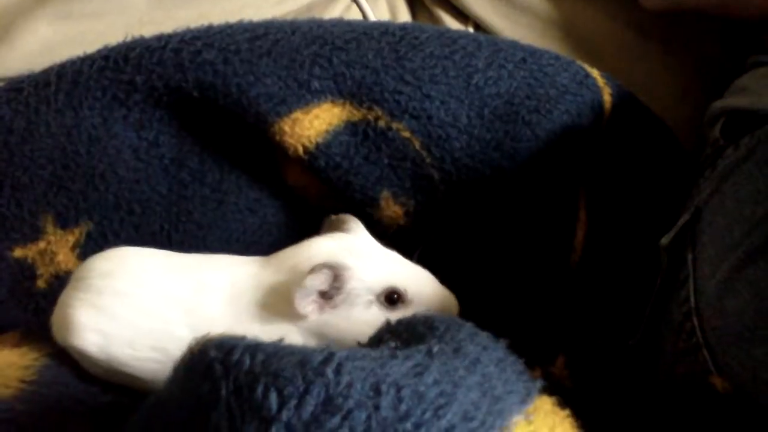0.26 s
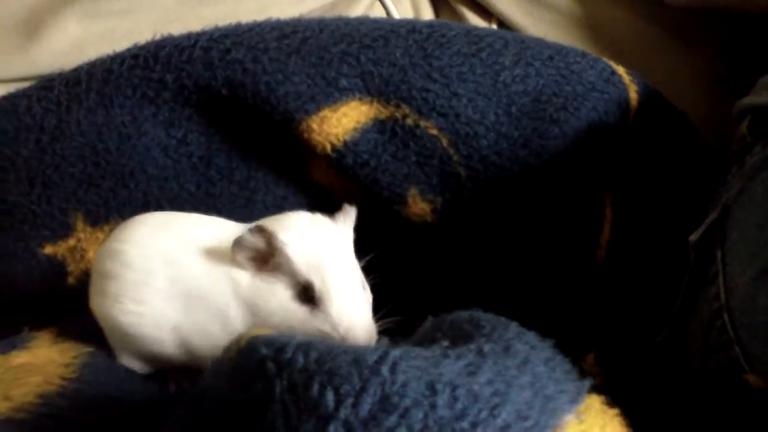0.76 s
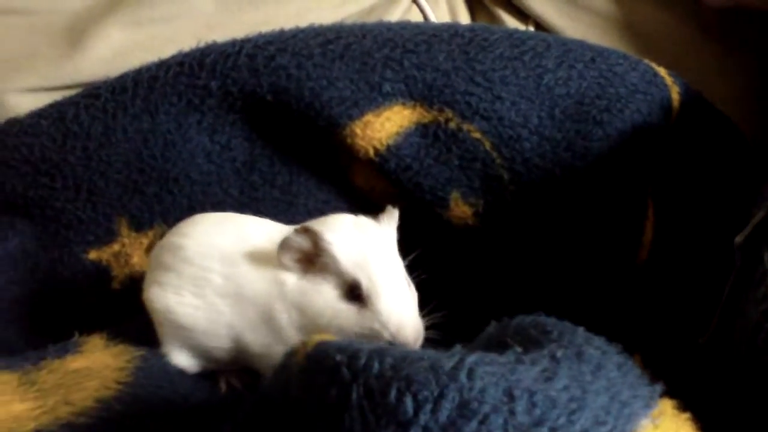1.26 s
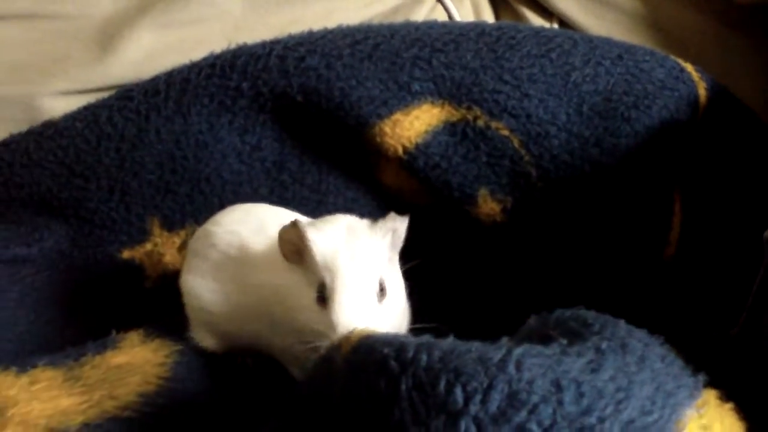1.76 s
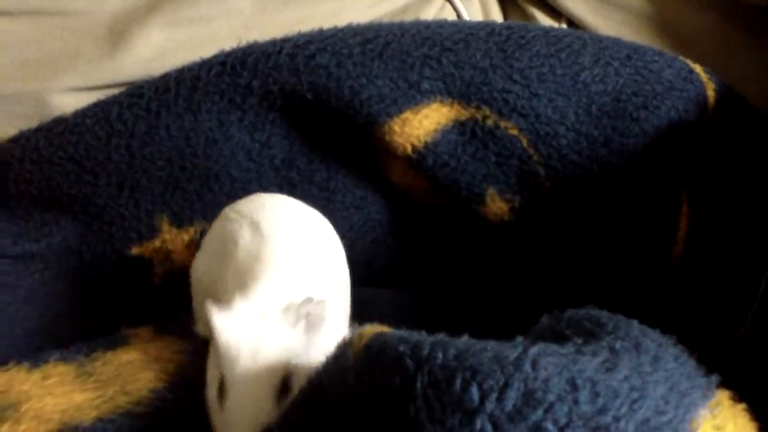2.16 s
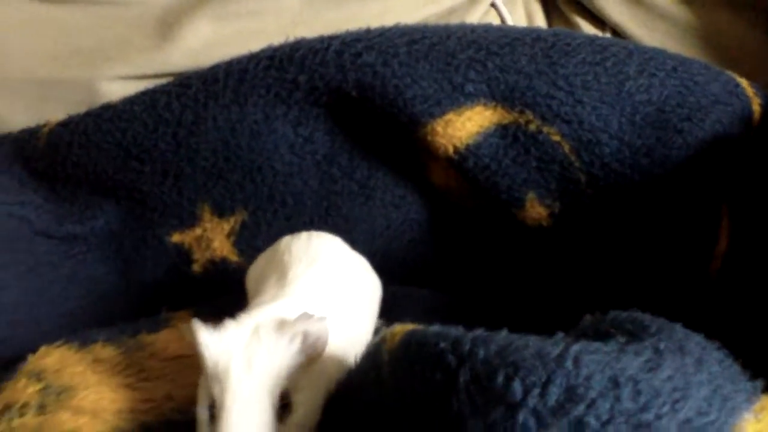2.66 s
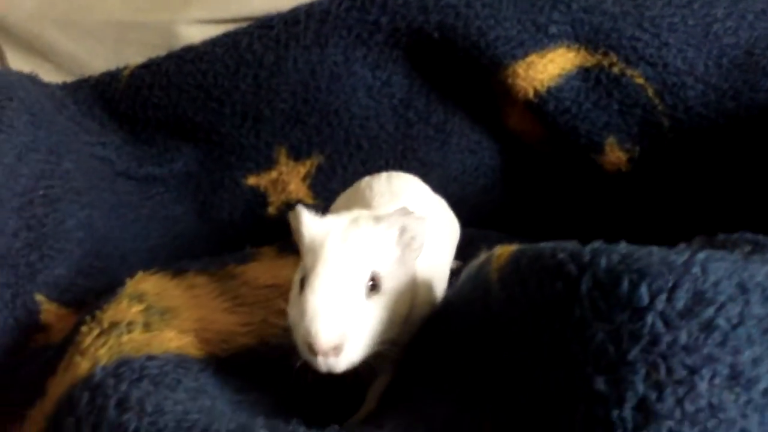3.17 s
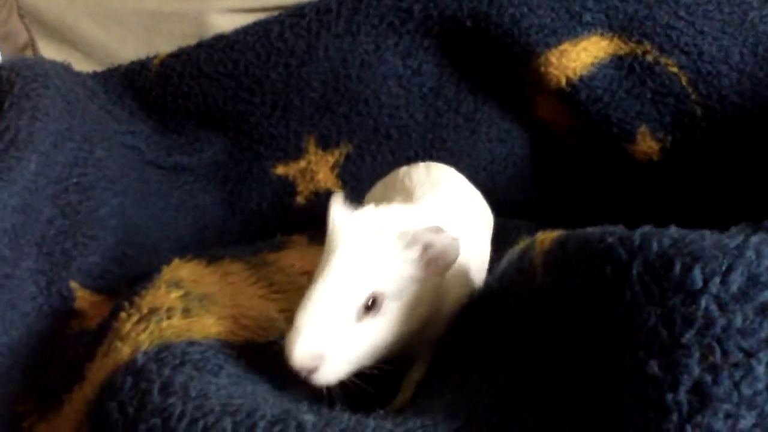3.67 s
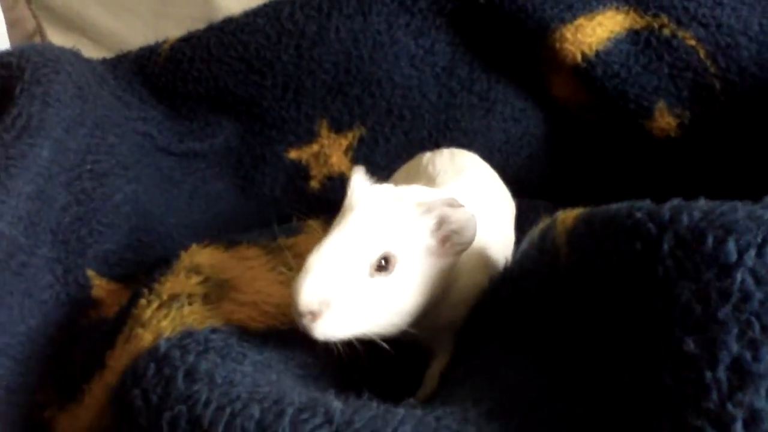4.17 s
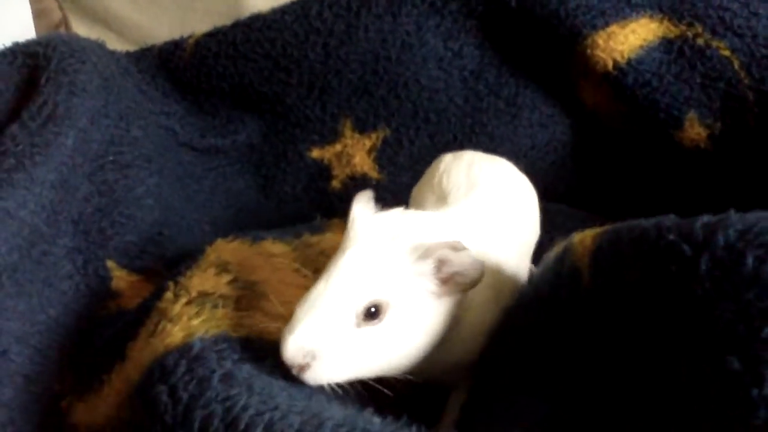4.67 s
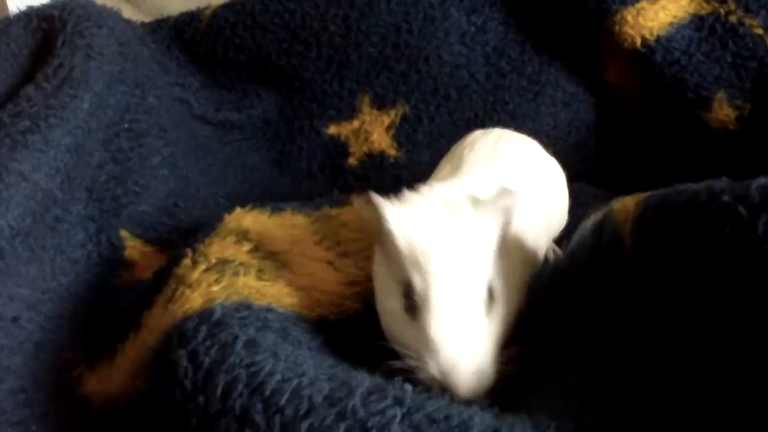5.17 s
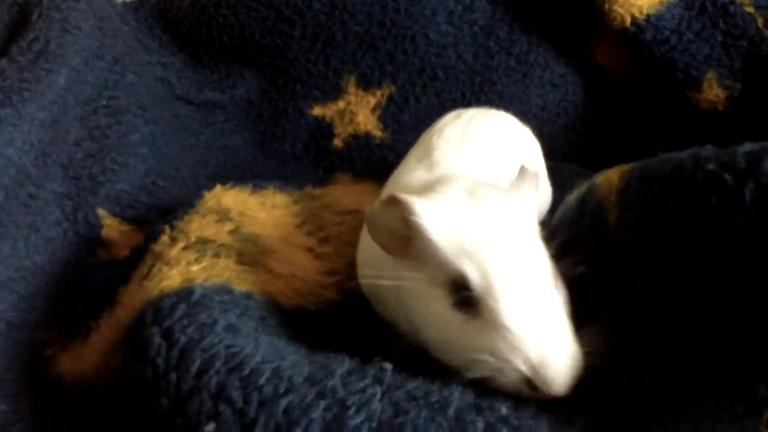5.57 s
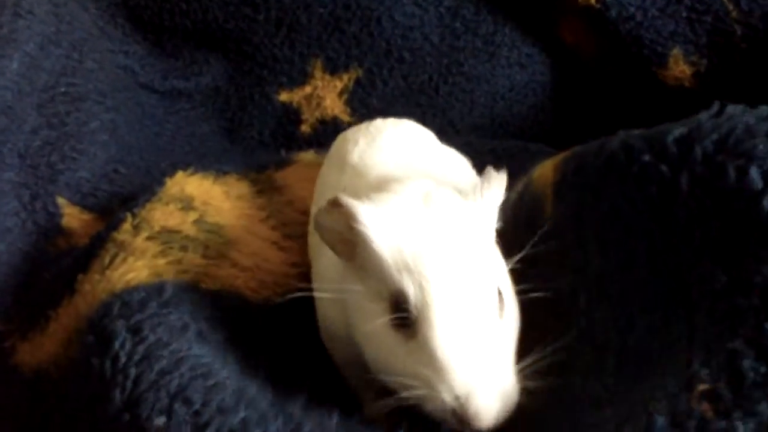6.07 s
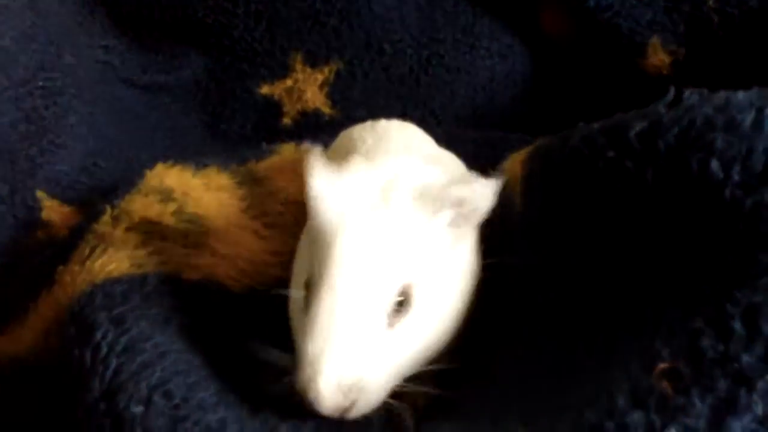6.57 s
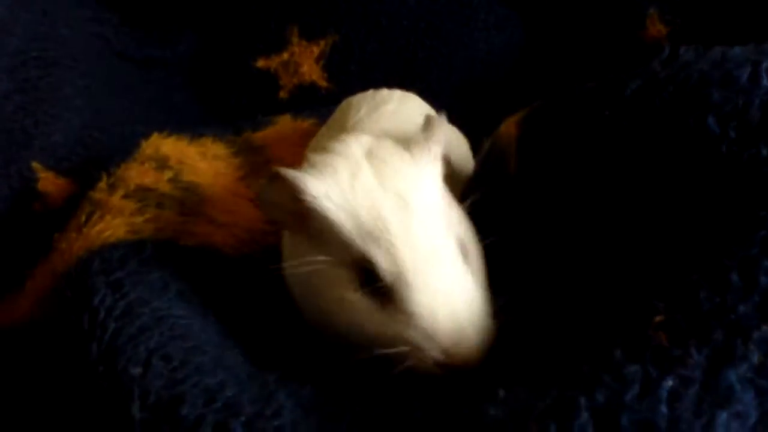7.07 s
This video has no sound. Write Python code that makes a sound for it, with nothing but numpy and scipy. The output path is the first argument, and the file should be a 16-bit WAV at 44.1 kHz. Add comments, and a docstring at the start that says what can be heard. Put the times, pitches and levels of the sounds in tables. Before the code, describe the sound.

Faint guinea pig squeaks and scratching on fleece in a quiet room, with louder camera handling knocks and cloth brushing midway.

```python
"""A quiet room: soft air, hiss, a low hum and a thin electronic whine run from start to end.
From the first moment a guinea pig gives soft, mostly rising squeaks and scratches at a fleece blanket.
At 2.5 s a hand close by shifts its grip on a camera: the case ticks, rasps and knocks under the fingers.
From 3.6 s cloth brushes past too, and the loudest knocks come just after 4 s.
The handling stops before 5 s, and the guinea pig squeaks three more times."""
import sys
import numpy as np
from scipy import signal
from scipy.fft import rfft, irfft, next_fast_len
from scipy.io import wavfile
from scipy.ndimage import map_coordinates

SR = 44100
rng = np.random.default_rng(int(sys.argv[2]) if len(sys.argv) > 2 else 0)


def log_audio(samples):
    """Write samples as a 16-bit WAV file to the path given in sys.argv[1]."""
    # one column per channel
    frames = np.atleast_2d(samples).T
    # limit to full scale, then quantise
    limited = np.clip(frames, -1, 1)
    pcm = np.round(limited * 32767).astype(np.int16)
    wavfile.write(sys.argv[1], SR, pcm)


N = 322355

# the notes the camera case rings with: pitch_hz, width_hz, struck_db, rubbed_db
CASE_NOTES = [(331, 53, 2, -0.5), (600, 150, -6.5, -29), (1020, 89, 2, -1.5), (1146, 95, 3, 1),
              (1680, 230, -14, -2), (2097, 63, 1, -8), (3230, 200, -12, -7), (4140, 700, -36, -17.5),
              (7650, 2600, -26, -24)]


def amp(db):
    """Turn decibels into a number to multiply by."""
    return 10 ** (np.asarray(db) / 20)


def unit(x):
    """Scale a sound to an average (rms) level of 1."""
    return x / np.sqrt(np.mean(x ** 2) + 1e-20)


def along(points, hz):
    """Read a curve of (pitch_hz, value) points, with the octaves evenly spaced."""
    pitches, values = np.transpose(points)
    return np.interp(np.log(hz + 1), np.log(pitches + 1), values)


def wobble(rate, size=N):
    """A smooth random curve through `rate` points a second."""
    t = np.arange(size) / SR
    return map_coordinates(rng.standard_normal(int(N * rate / SR) + 4), [t * rate])


def filtered(x, response):
    """Multiply each frequency in a sound by response(hz)."""
    size = next_fast_len(x.shape[-1] + 8192)
    hz = np.fft.rfftfreq(size, 1 / SR)
    return irfft(rfft(x, size) * response(hz), size)[..., :x.shape[-1]]


def coloured(x, colour):
    """Shape a sound with a curve of (pitch_hz, level_db) points, then scale it to level 1."""
    return unit(filtered(x, lambda hz: amp(along(colour, hz))))


def gate(t, start, end, edge):
    """1 between start and end, 0 outside, with sloping edges."""
    return np.clip(np.minimum(t - start, end - t) / edge + .5, 0, 1)


def shelf(hz, corner_hz):
    """Slide from 1 below the corner to 0 above it."""
    return 1 / (1 + (hz / corner_hz) ** 4)


def add(track, start_s, sound):
    """Mix a sound into the track at its start time."""
    part = track[round(start_s * SR):][:len(sound)]
    part += sound[:len(part)]


def background(air_db=-62, hiss_db=-68):
    """Room air and microphone hiss, wider in the treble, with a steady hum and whine."""
    # tone colour of the room air: pitch_hz, level_db
    air_colour = [(20, -16), (45, -55), (90, -19), (160, -8), (260, -4.5), (350, -4), (480, 1), (620, -1.5),
                  (1050, 1), (1700, -4.5), (3200, -8), (5500, -12.5), (9000, -22.5)]
    # tone colour of the hiss: pitch_hz, level_db
    hiss_colour = [(3000, -22), (5700, -3.5), (6450, 7.5), (7200, 3), (8200, 0.5), (8750, 2), (9500, -3),
                   (12000, -5), (15000, -4.5)]
    # how much left and right differ, against what they share: pitch_hz, side_db
    stereo_width = [(60, -28), (110, -27), (200, -31), (380, -19), (700, -14.5), (1290, -13.5),
                    (2380, -9.5), (4400, -7.5), (8120, -13), (15000, -3)]
    # the tones of the hum and whine: pitch_hz, level_db
    tones = [(60, -99), (242.3, -76), (7867, -64.5), (12408, -86)]
    t = np.arange(N) / SR
    air, hiss = rng.standard_normal((2, 2, N))
    middle, side = amp(air_db) * coloured(air, air_colour) + amp(hiss_db) * coloured(hiss, hiss_colour)
    side = filtered(side, lambda hz: amp(along(stereo_width, hz)))
    for pitch_hz, level_db in tones:
        middle += np.sqrt(2) * amp(level_db) * np.sin(2 * np.pi * pitch_hz * t + 0.25 * wobble(7.7))
    return np.array([middle + side, middle - side])


def voice(start_s, pitch_hz, level_db, overtones_db, attack_s=0.0051, release_s=0.0049):
    """One guinea pig call: a slightly shaky tone that gets purer the higher it goes."""
    # upper overtones, against the one an octave above the pitch: pitch_multiple, level_db
    upper_overtones = [(3, -9), (4, -11.5)]
    # they grow as the animal turns towards the camera: time_s, boost_db
    facing = [(2, -3.5), (5.5, 1.5)]
    even_hz, purer_db_per_octave = 745, 27
    size = len(pitch_hz)
    t = np.arange(size) / SR
    shaky_hz = pitch_hz * (1 + 0.012 * wobble(291, size))
    phase = 2 * np.pi * np.cumsum(shaky_hz) / SR
    facing_db = np.interp(start_s, *np.transpose(facing))
    upper = sum(amp(db + facing_db) * np.cos(multiple * phase) for multiple, db in upper_overtones)
    overtone_gain = amp(overtones_db - purer_db_per_octave * np.log2(pitch_hz / even_hz))
    tone = np.cos(phase) + overtone_gain * (np.cos(2 * phase) + upper)
    fade = np.clip(np.minimum(t / attack_s, (t[-1] - t) / release_s), 0, 1)
    return np.sqrt(2) * tone * fade * amp(level_db + wobble(126, size))


def squeaks():
    """The guinea pig's calls: short ones glide along a curve, mostly upward; long ones warble."""
    # short calls: start_s, length_s, start_hz, end_hz, middle_sag_hz, level_db, overtones_db
    short_calls = [ (0, .022, 715, 724, -2, -59.5, -1), (0.512, 0.054, 684, 880, 9, -62, -4.5),
                   (1.061, 0.077, 725, 780, 5, -62.5, -1), (1.386, 0.053, 700, 973, 67, -64, -3),
                   (1.46, .042, 1110, 1110, 22, -62, -4), (1.658, .04, 745, 785, 0, -66.5, -13),
                   (1.925, .047, 760, 807, 35, -65, -6), (5.204, 0.04, 768, 984, 20, -60, -3),
                   (5.82, .053, 745, 871, 52, -56.5, -2), (6.221, 0.035, 725, 835, 42, -58.5, -0.5), ]
    # two long squeals, each a list of points: time_s, pitch_hz, level_db
    squeals = [
        [(0.163, 671, -66), (0.189, 728, -59), (0.219, 730, -57.5), (0.245, 820, -59), (0.283, 767, -60),
         (0.288, 770.9, -71)],
        [(0.747, 705, -58.5), (0.779, 840, -58), (0.821, 950, -62), (0.861, 1410, -53), (0.881, 1294, -50),
         (0.908, 1659, -57)],
    ]
    out = np.zeros(N)
    for start_s, length_s, start_hz, end_hz, sag_hz, level_db, overtones_db in short_calls:
        progress = np.linspace(0, 1, round(length_s * SR))
        pitch_hz = start_hz + (end_hz - start_hz) * progress - sag_hz * np.sin(np.pi * progress)
        add(out, start_s, voice(start_s, pitch_hz, level_db, overtones_db))
    for points in squeals:
        times, pitches, levels = np.transpose(points)
        t = np.arange(times[0], times[-1], 1 / SR)
        pitch_hz, level_db = np.interp(t, times, pitches), np.interp(t, times, levels)
        add(out, times[0], voice(times[0], pitch_hz, level_db, overtones_db=1))
    return out


def slips(rate, smooth):
    """Rubbing: tiny random slips, `rate` a second, over a share of smooth noise."""
    jolts = (rng.random(N) < rate / SR) * rng.standard_normal(N)
    return unit(unit(jolts) + smooth * rng.standard_normal(N))


def scratches(rise_s=0.004, fall_s=0.0037):
    """Each claw stroke plucks a dense run of fibres and dies away."""
    # claws catching in the fleece: start_s, length_s, level_db
    strokes = [ (0.221, 0.028, -52), (.231, 0.0077, -49), (0.853, 0.018, -52.5), (1.901, 0.025, -53),
               (2.226, 0.017, -53.5), (2.306, 0.018, -57.5), (2.365, 0.0088, -46), (2.38, 0.013, -55.5),
               (2.411, 0.011, -50.5), (2.423, 0.1, -55.5), (2.498, 0.016, -54), ]
    # tone colour of a scratch: pitch_hz, level_db
    claw_colour = [(100, -41), (330, -4.5), (620, -13), (850, -0.5), (1350, -5.5), (1620, 3.5), (1780, 7),
                   (2050, -4.5), (3200, -12.5), (4500, -20.5), (6500, -15.5), (10000, -30), (15000, -33)]
    loudness, t = np.zeros(N), np.arange(N) / SR
    for start_s, length_s, level_db in strokes:
        rise = np.clip((t - start_s) / rise_s, 0, 1)
        fall = np.exp(-np.maximum(t - start_s - length_s, 0) / fall_s)
        loudness += amp(level_db) * rise * fall
    return loudness * coloured(slips(7000, smooth=1.0), claw_colour)


def click(colour_db, size=2048, travel_s=0.000995):
    """One click with the tone colour colour_db(hz), smeared on its way through a thin shell."""
    hz = np.fft.rfftfreq(size, 1 / SR)
    # folding the cepstrum (the log spectrum, turned back into time) puts all ringing after the hit
    cepstrum = irfft(np.log(amp(colour_db(hz))))
    cepstrum[1:size // 2] *= 2
    cepstrum[size // 2 + 1:] = 0
    # the shell bends in waves: 1 kHz arrives after travel_s, the treble sooner
    phase_lag = 4 * np.pi * travel_s * np.sqrt(1000 * hz)
    return irfft(np.exp(rfft(cepstrum) - 1j * phase_lag))


def ticks(chatter=0.1):
    """The case snaps and chatters for a few milliseconds."""
    # sharp snaps of the case: start_s, level_db, treble_db, body_db, chatter_s
    snaps = [(2.504, -48, 19, 12, 0.011), (2.691, -43.5, 9.5, -3, 0.0032), (3.633, -27.5, 1.5, 0.5, 0.0016),
             (3.7399, -35, -8, 13.5, 0.0016), (4.6275, -44, 13, -6, 0.0021)]
    # tone colour of a tick: pitch_hz, level_db
    tick_colour = [(100, -32), (300, -16), (700, -9), (1000, -5), (1300, -7), (1640, 5), (2050, -5),
                   (2550, 1), (2800, -3), (3150, 1), (3600, -11), (5200, -16), (6200, -22), (8500, -21),
                   (11000, -36), (15000, -48)]
    out, t = np.zeros(N), np.arange(SR // 20) / SR
    for start_s, level_db, treble_db, body_db, chatter_s in snaps:
        force = (t == 0) + chatter * rng.standard_normal(len(t)) * np.exp(-t / chatter_s)
        ring = click(lambda hz: along(tick_colour, hz)
                     + treble_db * (1 - shelf(hz, 4500)) + body_db * shelf(hz, 2070))
        snap = signal.fftconvolve(force, ring)
        add(out, start_s, amp(level_db) * snap / np.std(snap[:SR // 250]))  # level of the first 4 ms
    return out


def case_ring(strengths_db, thud_db, hardness_hz, thin_hz=220, bass_db=-7):
    """The case rings after one tap, with little deep bass; a soft touch gives little treble."""
    def colour_db(hz):
        power = sum(np.abs(amp(db) * hz * width / (pitch ** 2 - hz ** 2 + 1j * hz * width)) ** 2
                    for (pitch, width, _, _), db in zip(CASE_NOTES, strengths_db))
        notes_db = 10 * np.log10(power * shelf(hz, hardness_hz) + 1e-7)
        return notes_db + bass_db * shelf(hz, thin_hz) + thud_db * shelf(hz, 540)
    return click(colour_db)


def drags(low_notes_db=-6, uneven_db=0.5, edge_s=0.025):
    """A finger drags with a dry rasp; so light a touch favours the higher notes of the case."""
    # a finger sliding over the case: start_s, length_s, level_db, thud_db, hardness_hz
    slides = [(2.519, .14, -55, -3.5, 2420), (4.291, .068, -41.5, -10, 11000)]
    # as the finger presses on, the rasp grows louder and its notes climb
    press_db_per_s, climb_octaves_per_s = 29, 1.21
    out, t = np.zeros(N), np.arange(SR // 4) / SR
    pitch_hz, _, _, rubbed_db = np.transpose(CASE_NOTES)
    for start_s, length_s, level_db, thud_db, hardness_hz in slides:
        ring = case_ring(rubbed_db + low_notes_db * shelf(pitch_hz, 750), thud_db, hardness_hz)
        rasp = signal.fftconvolve(slips(3000, smooth=0.56)[:SR // 2], ring)
        from_middle_s = t - length_s / 2
        speed = 2 ** (climb_octaves_per_s * from_middle_s)
        climbing = unit(map_coordinates(rasp, [np.cumsum(speed)]))
        loudness = amp(level_db + press_db_per_s * from_middle_s + uneven_db * wobble(91, len(t)))
        add(out, start_s, loudness * gate(t, 0, length_s, edge_s) * climbing)
    return out


def knocks(skid_hardness_hz=10000, spread_db=-1.5, edge_s=0.019):
    """A fingertip strikes the case, then skids; each touch rings the notes at new strengths."""
    # fingertip taps: start_s, level_db, thud_db, hardness_hz, skid_s, skid_db
    taps = [(2.638, -45.5, 6.5, 1500, 0.015, -55.5), (3.859, -37, 1.5, 2400, 0.02, -56),
            (4.0512, -21.5, -2.5, 5000, 0.0075, -33), (4.1149, -27, 0.5, 2190, 0.012, -36),
            (4.1624, -23.5, 0, 1950, 0.016, -35), (4.2116, -38, -2.5, 2500, 0.024, -36.5),
            (4.276, -29, -3.5, 2180, 0.021, -36.5), (4.616, -46, 9.5, 1400, 0.015, -55)]
    out, t = np.zeros(N), np.arange(SR // 10) / SR
    rubbing = slips(4000, smooth=1.0)
    _, _, struck_db, rubbed_db = np.transpose(CASE_NOTES)
    for start_s, level_db, thud_db, hardness_hz, skid_s, skid_db in taps:
        blow_change_db, skid_change_db = spread_db * rng.standard_normal((2, len(CASE_NOTES)))
        blow = case_ring(struck_db + blow_change_db, thud_db, hardness_hz)
        add(out, start_s, amp(level_db) * blow / np.std(blow[:SR // 250]))  # level of the first 4 ms
        force = rubbing[round(start_s * SR):][:len(t)] * gate(t, 0, skid_s, edge_s)
        ring = case_ring(rubbed_db + skid_change_db, thud_db, skid_hardness_hz)
        skid = signal.fftconvolve(force, ring)[:len(t)]
        add(out, start_s, amp(skid_db) * skid / np.std(skid[t < skid_s]))
    return out


def brushes(treble_hz=3800, uneven_db=1.6):
    """Cloth brushes by with a fine, bright grain; each pass swells and fades."""
    # passes of the cloth: start_s, length_s, level_db, treble_db
    passes = [ (3.643, .055, -55.5, 6), (3.73, 0.09, -55, -3), (3.847, .1, -52.5, 0),
              (3.927, 0.067, -46.5, -0.5), (3.97, 0.16, -51, -5), (4.2, 0.36, -58, -1),
              (4.566, 0.13, -52.5, 7), (4.697, 0.11, -55.5, 5.5), ]
    # tone colour of rubbing cloth: pitch_hz, level_db
    cloth_colour = [(200, -25), (330, 7), (500, -7), (1100, 9.5), (1400, 3.5), (1750, 12.5), (2700, 0.5),
                    (3400, 3.5), (4500, -5), (5400, 2.5), (7000, -6), (10000, -19), (15000, -30)]
    out = np.zeros(N)
    fibres = coloured(slips(4000, smooth=0.67), cloth_colour) * amp(uneven_db * wobble(90))
    for start_s, length_s, level_db, treble_db in passes:
        swell = np.sin(np.linspace(0, np.pi, round(length_s * SR)))
        grain = fibres[round(start_s * SR):][:len(swell)]
        rustle = filtered(grain, lambda hz: amp(treble_db * (1 - shelf(hz, treble_hz))))
        add(out, start_s, amp(level_db) * swell * rustle)
    return out


def stereo_tail(x, fade_s=0.099, bass_db=-8):
    """A short, thin tail, different on left and right, slightly widens the near sounds."""
    t = np.arange(SR // 5) / SR
    noise = filtered(rng.standard_normal((2, len(t))), lambda hz: amp(bass_db * shelf(hz, 2600)))
    tail = noise * amp(-60 * t / fade_s)
    return signal.fftconvolve(x[None], tail / np.linalg.norm(tail[0]), axes=1)[:, :N]


def scene(tail_db=-26):
    """The near sounds sit in the middle, with a faint tail and the background around them."""
    near = squeaks() + scratches() + ticks() + knocks() + drags() + brushes()
    return near + amp(tail_db) * stereo_tail(near) + background()


def record(dry):
    """The camera keeps nothing above its highest frequency."""
    top_hz = 15300
    return filtered(dry, lambda hz: hz < top_hz)


dry = scene()
out = record(dry)
log_audio(out)
```